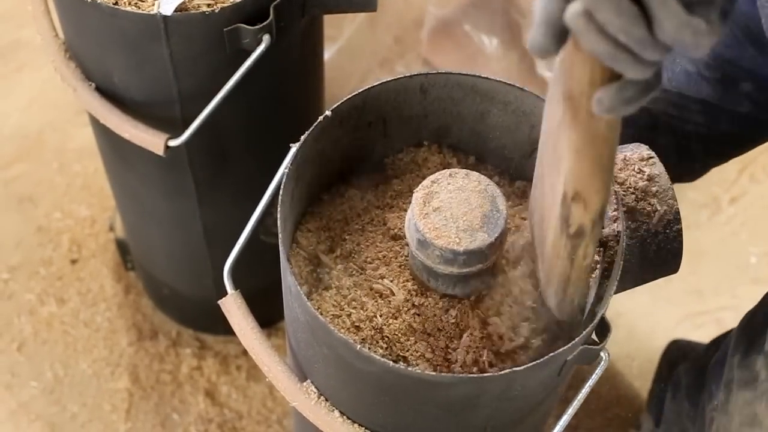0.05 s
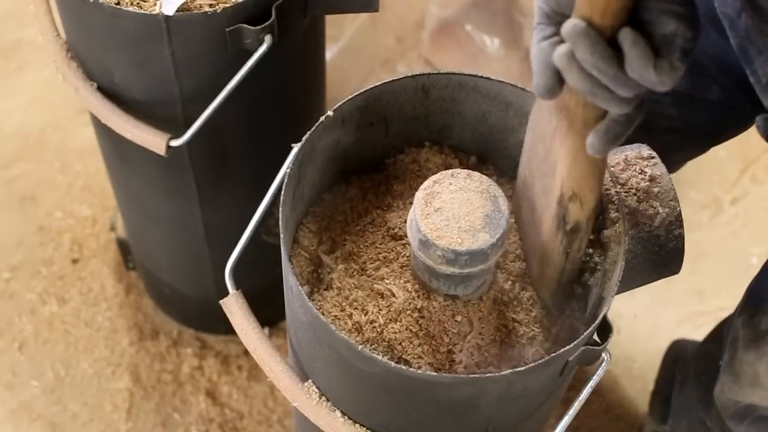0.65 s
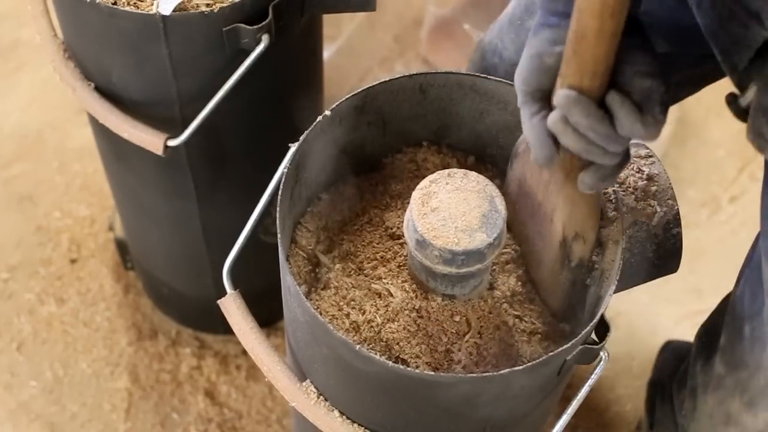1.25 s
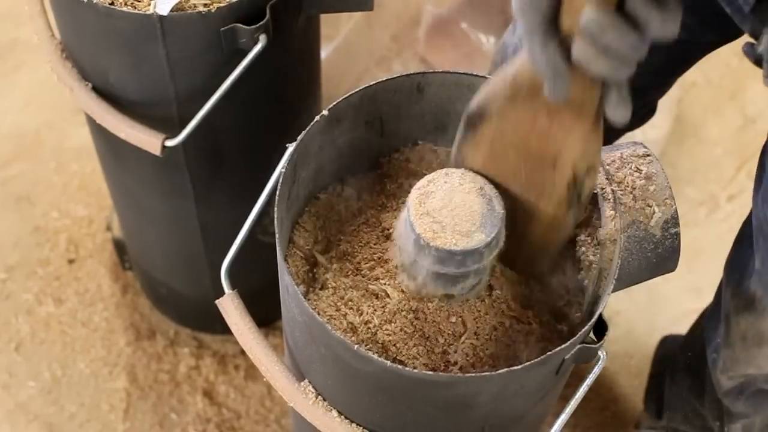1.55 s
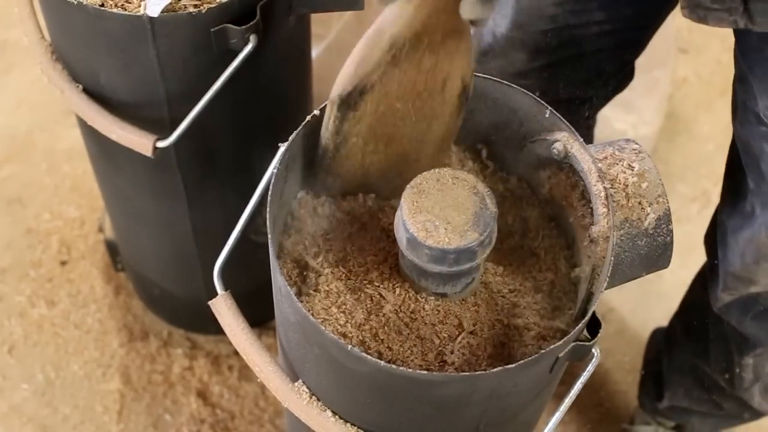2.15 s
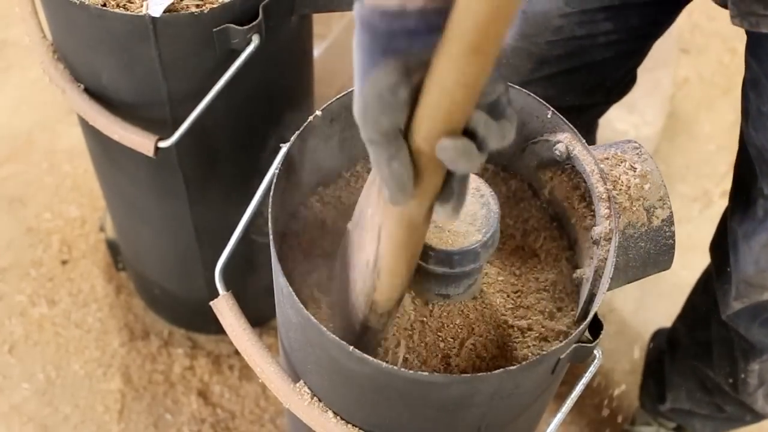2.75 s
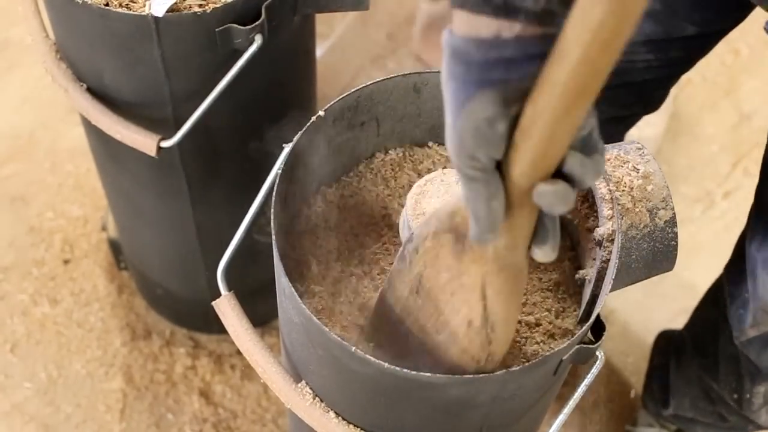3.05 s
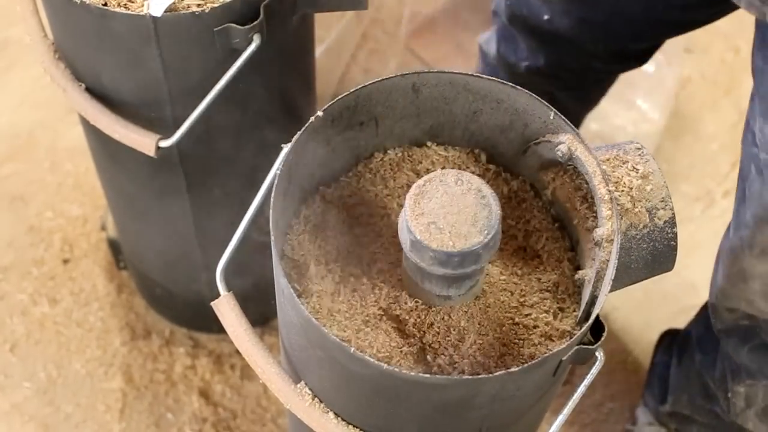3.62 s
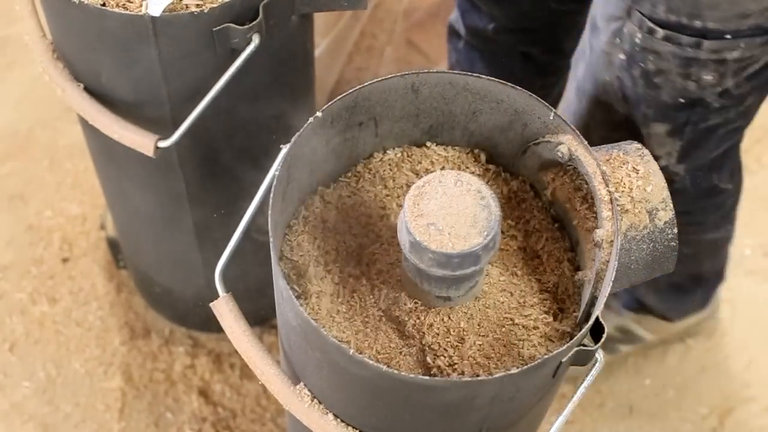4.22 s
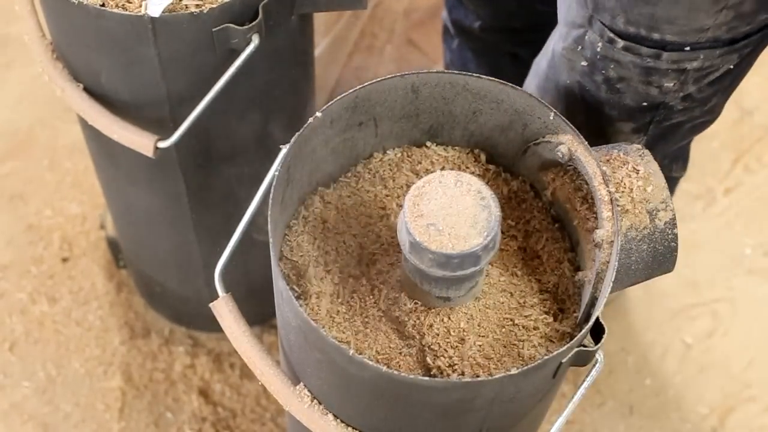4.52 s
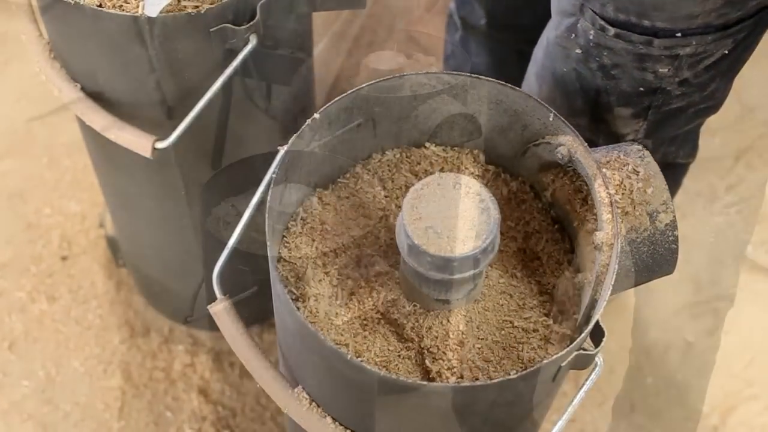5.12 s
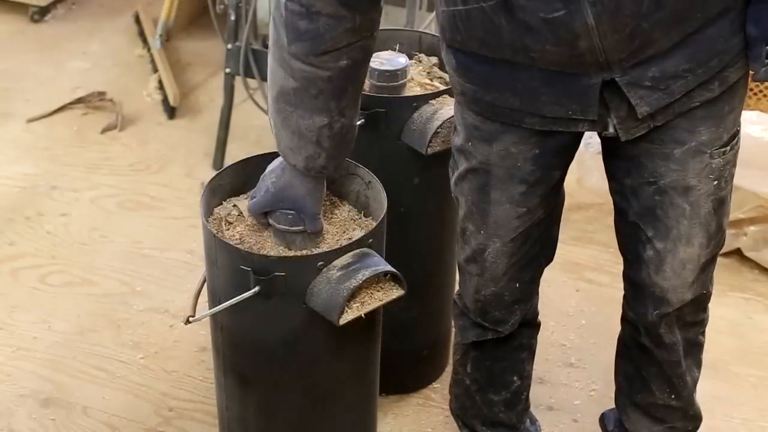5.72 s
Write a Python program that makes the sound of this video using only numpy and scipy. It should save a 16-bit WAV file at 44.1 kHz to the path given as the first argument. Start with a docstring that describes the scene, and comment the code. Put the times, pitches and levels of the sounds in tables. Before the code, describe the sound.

A wooden paddle pushes through sawdust in a steel drum, making uneven dry hisses and crunches for the first three and a half seconds. It knocks on the damped metal wall at about 0.3 seconds and gives a woodier knock at 1.6. A tiny squeak comes just after 2 seconds, then another knock at 2.4 and a cluster of low thuds up to a knock near 3. From about 2.8 to 3.4 seconds the paddle scrapes out along the wall with a rough groan and rasp, ending in a light metal tap. At 3.6 a boot drags across the gritty floor, and heavy work clothes rustle on and off from there. A firm knock lands at 4.2 seconds, a dull thud just after, and a last crunchy thump near 5.7. Everything is close, with slight reverberation and the faint steady air of a small workshop.

```python
"""A wooden paddle packs sawdust into a steel drum in a small workshop. First it hisses and crunches through
the dust, thuds on the packed bed and knocks on the wall, each impact exciting the drum's damped modes.
At two seconds it squeaks once; near three it is drawn out, scraping along the wall by stick-slip friction.
Then a boot drags over the gritty floor, work clothes rustle, and one more knock and a few dull thuds follow.
The sound is close and the same on both channels."""
import sys
import numpy as np
from scipy import signal
from scipy.fft import rfft, irfft, next_fast_len
from scipy.io import wavfile
from scipy.ndimage import map_coordinates

SR = 44100
rng = np.random.default_rng(int(sys.argv[2]) if len(sys.argv) > 2 else 0)


def digitize_waveform(pressure):
    """Quantize a signal to 16-bit integers and store it at the path in sys.argv[1].

    Rows of a 2-D input are taken as channels; values are limited to [-1, 1].
    """
    field = np.atleast_2d(pressure).T
    bounded = np.clip(field, -1, 1)
    quanta = np.round(bounded * 32767).astype(np.int16)
    wavfile.write(sys.argv[1], SR, quanta)


N = 259305

# Reverberation of the workshop. Each row: frequency in Hz, time to decay by 60 dB (T60) in seconds.
ROOM_DECAY = [(100, 0.23), (300, 0.98), (1000, 0.29), (4000, 0.3), (12000, 0.13)]
# Noise spectra. Each row: frequency in Hz, relative spectral density in dB.
AIR_SPECTRUM = [(25, 12), (55, 3), (110, 1.5), (300, 4), (1000, 0.5), (4000, -7.5), (10000, -18.5),
                (15500, -17)]  # air of the room
SWISH_SPECTRUM = [(1000, -52), (2800, 2.5), (5000, 0), (7000, -4.5), (11500, -4), (13500, -7), (15500, -16)]  # cloth rubbing
FOLD_SPECTRUM = [(25, -45), (70, -20), (150, -10.5), (300, 3), (480, -2.5), (830, 0.5), (1400, -2.5),
                 (2300, -4.5), (4200, -9.5), (6000, -23), (11000, -50)]  # cloth folding
SOLE_SPECTRUM = [(70, -34), (150, -13), (280, 2), (550, -5.5), (950, 0.5), (1600, -3.5), (3300, -5.5),
                 (5300, -11.5), (9000, -17), (12000, -23), (15500, -34)]  # sole on the floor
DUST_SPECTRUM = [(1000, -60), (2300, -15), (3300, -4), (4200, -5), (5100, -9), (8000, -5.5), (10500, -7),
                 (12500, -13), (15500, -24.5)]  # fine dust sliding
CHIP_SPECTRUM = [(60, -55), (220, -41), (500, -2), (900, 0.5), (1400, -1), (2100, -1.5), (2900, -4),
                 (3800, -3), (4600, -8), (6000, -15.5), (10000, -32)]  # chips or grit crushed
RUMBLE_SPECTRUM = [(25, -28), (55, -12), (90, -11), (140, 1), (230, 2), (340, 2.5), (480, -3.5), (900, -33),
                   (2500, -70)]  # filled drum pushed
# Modes of struck bodies. Each row: frequency in Hz, relative level in dB, T60 in seconds.
DRUM_MODES = [(124.5, -1, 0.32), (145.1, -2.5, 0.26), (177.6, 0.5, 0.1), (218, 0.5, 0.2), (237.5, 2, 0.16),
              (281, -11.5, 0.49), (313.5, -14, 0.29), (331.8, -4, 0.24), (365.6, -3, 0.35), (411.3, -8, .3),
              (501, -18, 0.21), (613, -6, 0.24)]  # filled drum
PADDLE_MODES = [(836, 5, 0.024), (1690, -1, 0.017), (3950, 3, 0.0064), (5660, 0, 0.0027)]  # paddle, damped by hand and dust
WALL_MODES = [(1121, -11.5, 0.064), (1287, -5, 0.015), (1840, -18, 0.088), (2030, -8, 0.028),
              (2260, -2, 0.02), (2690, -5, 0.021), (3260, -2, 0.019)]  # steel wall, damped by the filling
# Resonances of the rubbed drum and blade. Each row: frequency in Hz, bandwidth in Hz, relative gain in dB.
GROAN_RESONANCES = [(288, 51, -2), (473, 64, -1.5), (880, 130, -5.5), (1055, 54, -14)]
RASP_RESONANCES = [(1680, 80, 0), (1765, 75, -1.5), (2620, 130, -10), (3300, 300, -14), (4250, 800, -16)]
# Movements of legs and arms. Each row: time of peak speed, rise and fall in seconds, swish and folds in dB.
LIMB_MOVES = [(3.68, .09, 0.093, -41, -53), (4.01, .044, 0.15, -68, -49.5), (4.206, .142, 0.045, -46, -49),
              (4.301, .04, 0.065, -54, -47.5), (4.469, 0.058, 0.048, -48.5, -41),
              (4.536, .03, .075, -49.5, -48.5), (4.718, .13, .22, -43, -46.5),
              (4.914, .051, 0.095, -53, -44), (5.224, 0.13, 0.1, -48, -49.5),
              (5.46, 0.15, 0.17, -55.5, -60), (5.838, .04, .06, -62.5, -56.5)]
# Grit cracking under the sole. Each row: start in seconds, level in dB.
GRIT_CRACKS = [(3.578, -34.5), (3.593, -28.5), (3.640, -48), (3.713, -40), (3.900, -32.5)]
# Scrapes along the wall. Each row: time of peak speed, rise and fall in seconds, groan and rasp in dB.
WALL_SCRAPES = [(2.83, 0.06, 0.1, -48, -52), (3.165, 0.13, 0.14, -40.5, -50.5),
                (3.317, 0.051, 0.031, -35, -31.5), (3.36, 0.042, 0.072, -35.5, -41)]
# Strokes through the dust. Each row: time of peak speed, rise and fall in seconds, hiss and crunch in dB.
PADDLE_STROKES = [(0.046, 0.118, 0.057, -37.5, -43), (0.094, 0.04, 0.03, -40.5, -49),
                  (0.319, 0.21, 0.041, -49.0, -50.5), (0.449, 0.064, 0.077, -48, -47.5),
                  (0.642, 0.056, 0.024, -54, -62.5), (0.695, 0.033, 0.022, -51, -50),
                  (0.88, 0.09, 0.036, -42.0, -43.5), (0.996, 0.059, 0.074, -46.5, -43),
                  (1.152, 0.094, 0.14, -51.5, -45), (1.336, 0.079, 0.063, -41.5, -45),
                  (1.531, 0.13, 0.03, -36.5, -41), (1.72, 0.076, 0.031, -36, -38),
                  (1.929, 0.13, 0.032, -37.5, -42), (2.068, 0.061, 0.037, -35, -40),
                  (2.295, 0.24, 0.075, -40, -43.5), (2.465, 0.081, 0.13, -40.5, -43),
                  (2.675, 0.12, 0.034, -39.0, -45.5), (2.882, 0.12, 0.038, -42.5, -43.0),
                  (3.053, 0.09, 0.018, -44, -47), (3.171, 0.101, 0.015, -46.5, -41.5),
                  (3.399, 0.175, 0.19, -46, -41.5)]
# Soft blows of paddle, boot or fist. Each row: start in seconds, thud level in dB, register in Hz,
# spread in octaves, rise in seconds, crunch level in dB.
SOFT_BLOWS = [(0.439, -42, 216, 0.79, 0.0012, -42), (0.474, -38, 180, 0.34, .004, -55),
              (1.798, -34, 206, 0.77, 0.00099, -29), (2.446, -23, 137, 0.31, 0.013, -52),
              (2.674, -27.5, 275, 0.18, 0.0024, -32), (2.716, -32.5, 257, 0.5, 0.0033, -52),
              (2.831, -26, 290, 0.21, 0.0039, -47), (2.860, -27.5, 258, 0.32, 0.0026, -44),
              (3.927, -39, 134, .4, 0.0053, -34.5), (4.2442, -21, 217, 0.41, 0.00067, -29),
              (4.429, -18.5, 136, 0.79, 0.03, -47), (5.7245, -20.5, 250, 0.66, 0.0014, -21),
              (5.739, -15.5, 137, 0.14, 0.016, -23)]
# Hard blows on the drum. Each row: start in seconds, thud level in dB, register in Hz, spread in octaves,
# rise in seconds, levels of floor, paddle, wall and crunch in dB, treble cutoff of the contact in Hz.
HARD_BLOWS = [(0.296, -18.5, 184, 1.17, 0.00072, -43, -30.5, -16.5, -21, 3160),
              (1.632, -22, 230, 0.93, 0.0019, -40, -14.5, -47, -27.5, 8000),
              (2.425, -21, 257, 0.91, 0.0011, -48, -25.5, -37, -20.5, 4700),
              (3.057, -23.5, 290, 0.7, 0.0073, -65, -23, -20, -30, 3000),
              (3.354, -59, 396, 0.64, .001, -73, -36, -21.5, -53, 1790),
              (4.2232, -15, 319, 0.55, 0.0037, -41.5, -24.5, -14, -17.5, 1400)]

# Exponents of a movement's rise and fall: 1 is pointed, 2 rounded. The bed stops a stroke short.
STROKE_SHAPE, MOVE_SHAPE = (2.2, 1.08), (1.56, 1.53)


def amp(db):
    """Amplitude ratio of a level in decibels."""
    return 10 ** (np.asarray(db) / 20)


def unit(x):
    """Normalisation to rms 1."""
    return x / np.sqrt(np.mean(x ** 2) + 1e-20)


def along(points, hz):
    """Interpolation of (Hz, value) points on a logarithmic frequency axis."""
    freqs, values = np.transpose(points)
    return np.interp(np.log(hz + 1), np.log(freqs + 1), values)


def add(track, start_s, sound):
    """Superposition of a sound on the track."""
    start = round(start_s * SR)
    track[start:start + len(sound)] += sound[:N - start]


def filtered(x, response):
    """Linear filtering: the spectrum is multiplied by a frequency response."""
    size = next_fast_len(len(x) + 8192)
    return irfft(rfft(x, size) * response(np.fft.rfftfreq(size, 1 / SR)), size)[:len(x)]


def coloured(x, spectrum):
    """Spectral shaping by a table, at rms 1."""
    return unit(filtered(x, lambda hz: amp(along(spectrum, hz))))


def resonant(x, resonances):
    """Forced vibration of parallel resonators of alternating sign, at rms 1."""
    def response(hz):
        return sum((-1) ** k * amp(db) * 1j * hz * width / (centre ** 2 - hz ** 2 + 1j * hz * width)
                   for k, (centre, width, db) in enumerate(resonances))
    return unit(filtered(x, response))


def ring(modes, t, vary_db, weight=np.ones_like):
    """Free vibration: damped modes of alternating sign, their strengths varying from blow to blow."""
    hz, db, t60 = np.transpose(modes)[:, :, None]
    signs = (-1) ** np.arange(len(hz))[:, None]
    strengths = signs * weight(hz) * amp(db + vary_db * rng.standard_normal(hz.shape))
    return np.sum(strengths * amp(-60 * t / t60) * np.sin(2 * np.pi * hz * t), axis=0)


def flicker(depth_db, rate_hz):
    """Amplitude modulation: a gain that wanders smoothly at random."""
    knots = rng.standard_normal(int(N * rate_hz / SR) + 4)
    return amp(depth_db * map_coordinates(knots, [np.arange(N) * rate_hz / SR]))


def grains(per_s, scatter_db):
    """Shot noise of friction: random slips of uneven size over a Gaussian bed of finer ones."""
    sizes = amp(scatter_db * np.minimum(rng.exponential(size=N), 5)) * rng.choice([-1, 1], N)
    slips = unit(sizes * (rng.random(N) < per_s / SR))
    return unit(slips + rng.standard_normal(N))


def speed(peak_s, rise, fall, shape):
    """Speed of one movement: it gathers to 1 at peak_s and dies away."""
    t = np.arange(N) / SR - peak_s
    before, after = (-t[t < 0] / rise) ** shape[0], (t[t >= 0] / fall) ** shape[1]
    return np.exp(-np.concatenate([before, after]))


def room(x, wet_db):
    """Reverberation: a diffuse tail builds up behind the direct sound and decays exponentially."""
    hz, frame_s, bands = signal.stft(rng.standard_normal(SR // 2), SR, nperseg=256)
    decay = amp(-60 * frame_s / along(ROOM_DECAY, hz)[:, None])
    tail = signal.istft(bands * decay, SR, nperseg=256)[1]
    tail *= 1 - np.exp(-(np.arange(len(tail)) / SR / 0.0044) ** 2)
    return x + amp(wet_db) * signal.fftconvolve(x, tail / np.linalg.norm(tail))[:len(x)]


def workshop_air():
    """Stationary noise: the steady air of the room."""
    return amp(-57) * coloured(rng.standard_normal(N), AIR_SPECTRUM)


def clothes():
    """Heavy cloth swishes by friction and rustles by folding; incoherent movements add in power."""
    swish_power, fold_power = np.zeros((2, N))
    for peak_s, rise, fall, swish_db, folds_db in LIMB_MOVES:
        limb_speed = speed(peak_s, rise, fall, MOVE_SHAPE)
        swish_power += (amp(swish_db) * limb_speed) ** 2
        fold_power += (amp(folds_db) * limb_speed ** 0.64) ** 2
    folds = np.sqrt(fold_power) * coloured(grains(per_s=700, scatter_db=1), FOLD_SPECTRUM)
    swish = np.sqrt(swish_power) * coloured(grains(per_s=3500, scatter_db=2.5), SWISH_SPECTRUM)
    return (folds + swish) * flicker(depth_db=0.51, rate_hz=45)


def boot(start_s=3.573, attack_s=0.02, hold_s=0.25, release_s=0.11):
    """Sliding friction and fracture: a sole grinds over the floor and cracks a few bits of grit."""
    since = np.maximum(np.arange(N) / SR - start_s, 0)
    drag = (1 - np.exp(-since / attack_s)) * np.exp(-np.maximum(since - hold_s, 0) / release_s)
    grinding = coloured(grains(per_s=1500, scatter_db=3), SOLE_SPECTRUM)
    out = amp(-35) * drag * grinding * flicker(depth_db=0.9, rate_hz=45)
    t = np.arange(SR // 20) / SR
    for crack_s, db in GRIT_CRACKS:
        crack = coloured(rng.standard_normal(len(t)), CHIP_SPECTRUM) * amp(-60 * t / 0.02)
        add(out, crack_s, amp(db) * crack)
    return out


def squeak(peak_s=2.063, width_s=0.011, pitch_hz=1925, octaves_per_s=-23):
    """Periodic stick-slip of the blade on chips: a tone and its octave sink as the blade slows."""
    t = np.linspace(-4, 4, round(8 * width_s * SR)) * width_s
    phase = 2 * np.pi * np.cumsum(pitch_hz * 2 ** (octaves_per_s * t)) / SR
    tone = np.sin(phase) + 1.1 * np.sin(2 * phase)
    out = np.zeros(N)
    add(out, peak_s + t[0], amp(-36.5) * np.exp(-(t / width_s) ** 2) * tone)
    return out


def scrape():
    """Irregular stick-slip of wood on steel drives resonances: the drum groans, the blade rasps."""
    groan_power, rasp_power = np.zeros((2, N))
    for peak_s, rise, fall, groan_db, rasp_db in WALL_SCRAPES:
        blade_speed = speed(peak_s, rise, fall, MOVE_SHAPE)
        groan_power += (amp(groan_db) * blade_speed) ** 2
        rasp_power += (amp(rasp_db) * blade_speed) ** 2
    groan = np.sqrt(groan_power) * resonant(grains(per_s=440, scatter_db=3), GROAN_RESONANCES)
    rasp = np.sqrt(rasp_power) * resonant(grains(per_s=830, scatter_db=-1), RASP_RESONANCES)
    rumble = np.sqrt(groan_power) * coloured(grains(per_s=150, scatter_db=1), RUMBLE_SPECTRUM)
    # dust between the surfaces rounds off each slip
    rubbed = signal.lfilter(*signal.butter(3, 6500, fs=SR), groan + rasp)
    return room(rubbed * flicker(depth_db=1.6, rate_hz=70), wet_db=-12) + amp(-6.5) * rumble


def sawdust():
    """Granular friction: dust hisses along the blade, chips crunch under it and the drum rumbles."""
    hiss_power, chip_power, rumble_power = np.zeros((3, N))
    for peak_s, rise, fall, hiss_db, chips_db in PADDLE_STROKES:
        blade_speed = speed(peak_s, rise, fall, STROKE_SHAPE)
        hiss_power = np.maximum(hiss_power, (amp(hiss_db) * blade_speed) ** 2)  # one stroke at a time
        # exponents below 1 let crunch and rumble outlast the hiss
        chip_power += (amp(chips_db) * blade_speed ** 0.66) ** 2
        rumble_power += (amp(chips_db - 8.5) * blade_speed ** 0.45) ** 2
    hiss = np.sqrt(hiss_power) * coloured(grains(per_s=5000, scatter_db=1), DUST_SPECTRUM)
    chips = np.sqrt(chip_power) * coloured(grains(per_s=1500, scatter_db=3), CHIP_SPECTRUM)
    rumble = np.sqrt(rumble_power) * coloured(grains(per_s=170, scatter_db=0.5), RUMBLE_SPECTRUM)
    return (hiss + chips) * flicker(depth_db=1.16, rate_hz=38.47) + rumble


def crunch(t, cutoff_hz):
    """Fracture of chips: a crack and a short crumble, scaled to offset the power lost above cutoff_hz."""
    crack, crumble = 2 * amp(-60 * t / 0.012), 0.5 * amp(-60 * t / 0.22)
    return rng.standard_normal(len(t)) * (crack + crumble) * np.sqrt(3000 / cutoff_hz)


def muffled(x, cutoff_hz):
    """Band limiting: a small contact radiates little deep bass and loses its treble above the cutoff."""
    thin = signal.lfilter(*signal.butter(2, 131, "highpass", fs=SR), x)
    return signal.lfilter(*signal.butter(2, cutoff_hz, fs=SR), thin)


def drum_thud(t, register_hz, spread, rise):
    """Impact excitation: the bed yields, modes near the blow's register ring and the filling settles."""
    def band(hz):
        return 1 / (1 + (np.log2((hz + 1) / register_hz) / spread) ** 2 / 2) ** 2
    push = 2.8 * amp(-60 * t / 0.038) * np.sin(2 * np.pi * register_hz * t)
    drum = 0.57 * ring(DRUM_MODES, t, vary_db=2.5, weight=band)
    settling = 0.36 * unit(filtered(rng.standard_normal(len(t)), band)) * amp(-60 * t / 0.28)
    # so small a body radiates little below its lowest mode
    radiation = signal.butter(4, 82, "highpass", fs=SR)
    return signal.lfilter(*radiation, (push + drum + settling) * (1 - np.exp(-t / rise)))


def blow_in_room(thud, contact):
    """Reverberation of a blow: the room answers the contact more than the thud."""
    return room(thud, wet_db=-16.5) + room(contact, wet_db=-9)


def thuds(cutoff_hz=630):
    """A cushioned impact carries little treble: it gives only a low thud and a dull crunch."""
    out, t = np.zeros(N), np.arange(int(0.7 * SR)) / SR
    for start_s, thud_db, register_hz, spread, rise, crunch_db in SOFT_BLOWS:
        thud = amp(thud_db) * drum_thud(t, register_hz, spread, rise)
        chips = amp(crunch_db) * crunch(t, cutoff_hz) * (1 - np.exp(-t / rise))
        add(out, start_s, blow_in_room(thud, muffled(chips, cutoff_hz)))
    return out


def knocks(floor_hz=55, floor_t60=0.93):
    """A hard impact excites a wide band: drum and floor shake, paddle and steel wall ring."""
    out, t = np.zeros(N), np.arange(int(0.7 * SR)) / SR
    floor = amp(-60 * t / floor_t60) * np.sin(2 * np.pi * floor_hz * t) * (1 - np.exp(-t / 0.017))
    for (start_s, thud_db, register_hz, spread, rise,
         floor_db, paddle_db, wall_db, crunch_db, cutoff_hz) in HARD_BLOWS:
        thud = amp(thud_db) * drum_thud(t, register_hz, spread, rise) + amp(floor_db) * floor
        wood = amp(paddle_db) * ring(PADDLE_MODES, t, vary_db=0.5)
        steel = amp(wall_db) * ring(WALL_MODES, t, vary_db=1.6)
        chips = amp(crunch_db) * crunch(t, cutoff_hz)
        contact = wood + (steel + chips) * (1 - np.exp(-t / rise))
        add(out, start_s, blow_in_room(thud, muffled(contact, cutoff_hz)))
    return out


def scene():
    """Superposition: all sources add at one point, heard alike on both channels."""
    mono = knocks() + thuds() + sawdust() + squeak() + scrape() + boot() + clothes() + workshop_air()
    return np.array([mono, mono])


def record(dry):
    """Band limiting: the deepest bass is thinned and nothing passes above 15750 Hz."""
    bass_cut = signal.butter(2, 42, "highpass", fs=SR)
    return np.array([filtered(signal.lfilter(*bass_cut, ch), lambda hz: hz < 15750) for ch in dry])


dry = scene()
out = record(dry)
digitize_waveform(out)
```